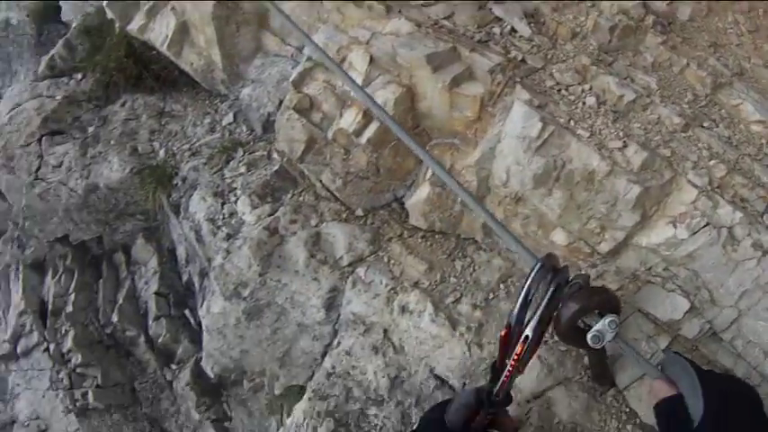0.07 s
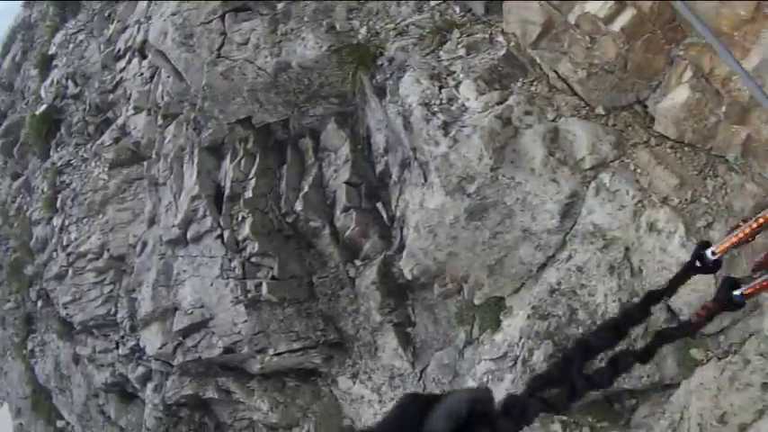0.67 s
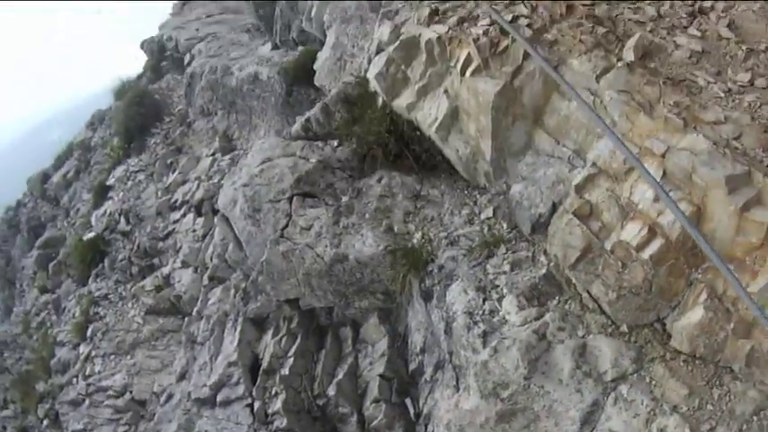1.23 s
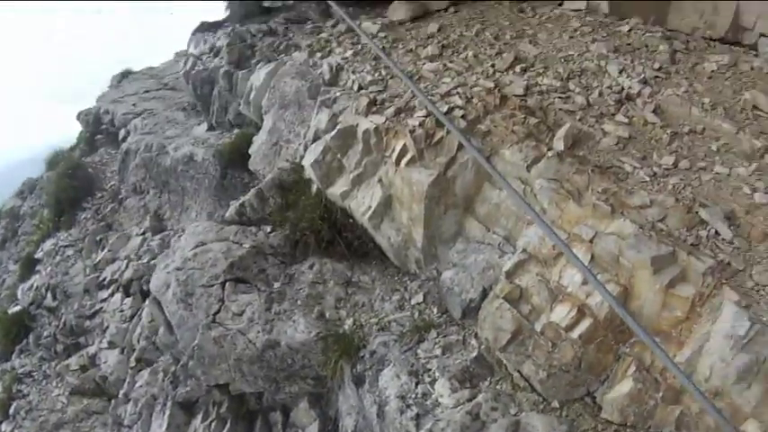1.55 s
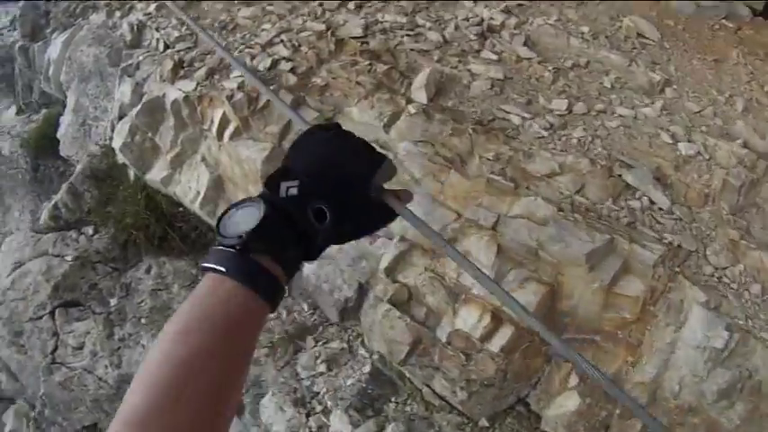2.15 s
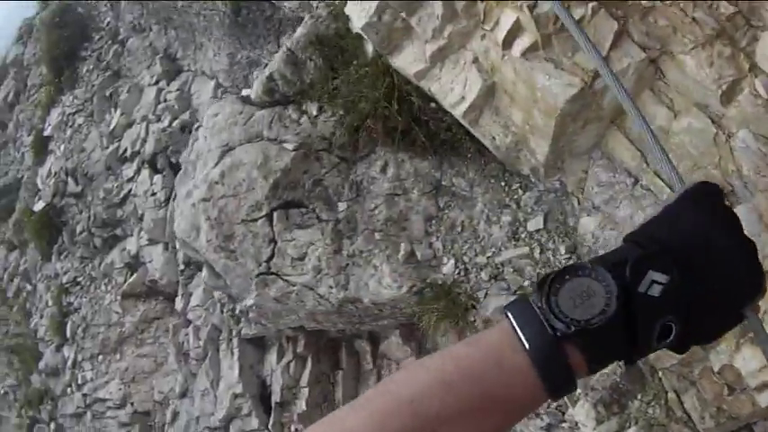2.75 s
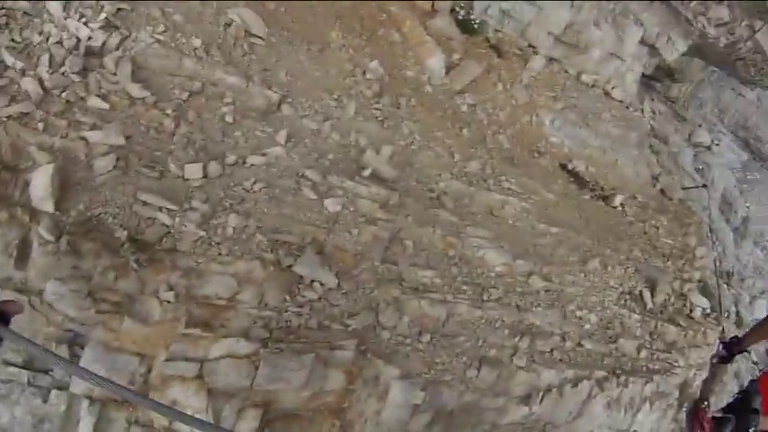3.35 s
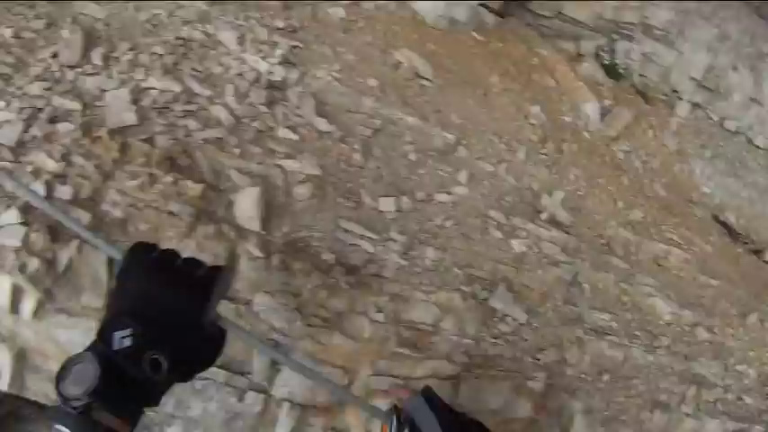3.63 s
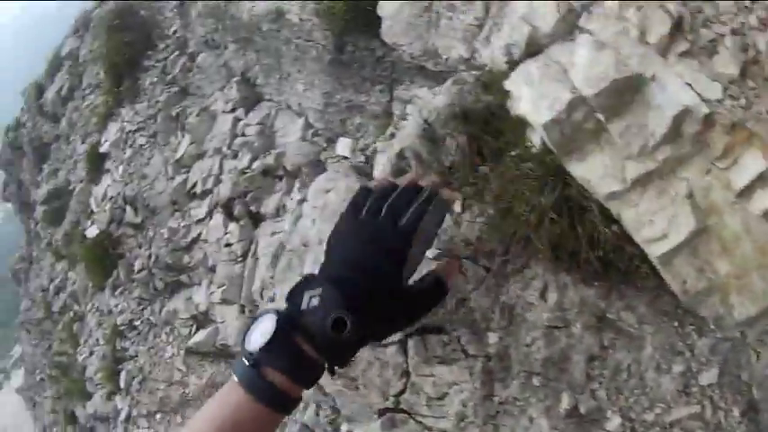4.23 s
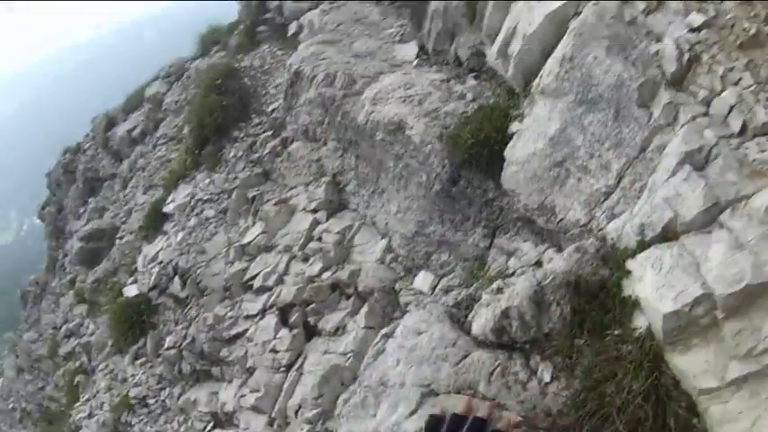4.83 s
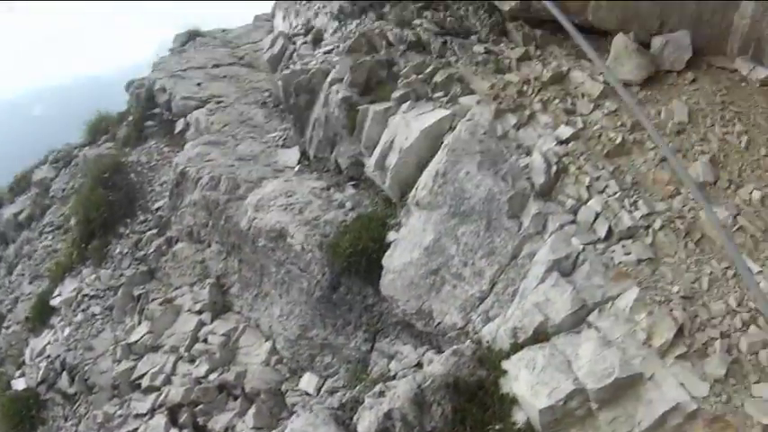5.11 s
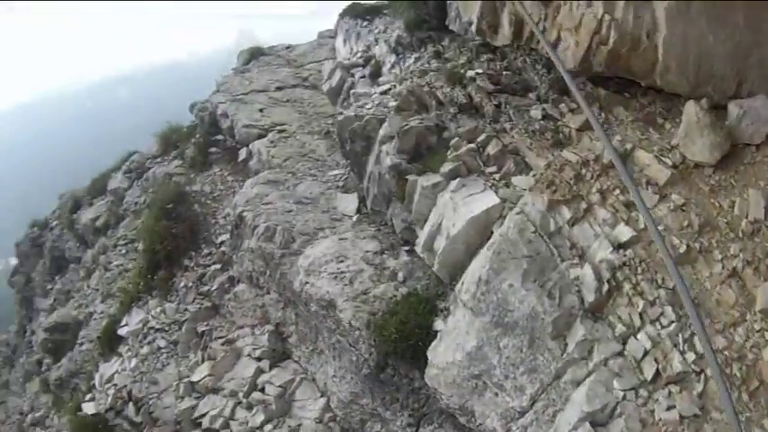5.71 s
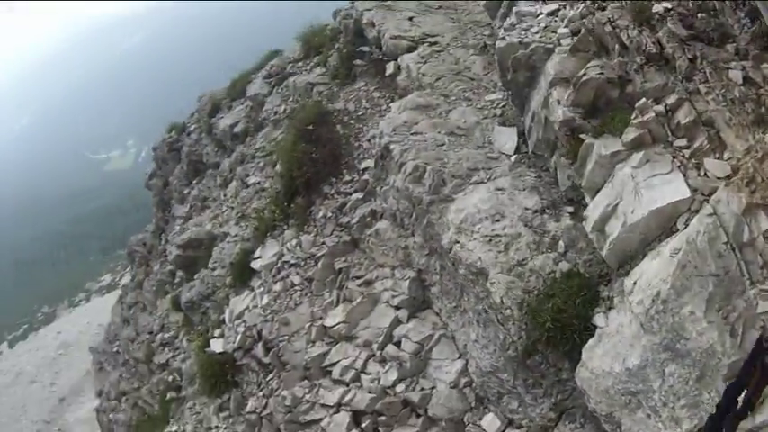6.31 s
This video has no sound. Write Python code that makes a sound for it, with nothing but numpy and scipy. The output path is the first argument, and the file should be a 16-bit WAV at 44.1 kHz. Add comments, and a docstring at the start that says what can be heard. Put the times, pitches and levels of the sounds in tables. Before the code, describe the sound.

Two carabiners clink irregularly and scrape along a steel cable as a climber moves across a rock face. Boots and clothing scuff, a glove zips over the wire strands, and webbing rasps. The sliding grows longer in the middle and again near the end. Everything is close and slightly boxy, heard from a helmet microphone in a closed case, with low rumble, dull thuds and a faint steady hiss underneath.

```python
"""Climbing a steel cable

A climber on a rock face, heard from a camera in a closed case on the helmet; the case rings near 2 kHz.
Two carabiners clink and slide on the cable, a glove zips over its strands, boots and clothing scuff
and webbing rasps. Underneath, the moving body rumbles in the mount over a faint steady hiss."""
import sys
import numpy as np
from scipy import signal
from scipy.fft import rfft, irfft, next_fast_len
from scipy.io import wavfile

SR = 44100
rng = np.random.default_rng(int(sys.argv[2]) if len(sys.argv) > 2 else 0)


def wav_out(sig):
    """Save sig, one row per channel (or a flat mono array), as 16-bit PCM at SR to the path in sys.argv[1]."""
    wavfile.write(sys.argv[1], SR, np.round(np.clip(np.atleast_2d(sig).T, -1, 1) * 32767).astype(np.int16))


N = 289289
TIME = np.arange(N) / SR


def amp(db):
    """Decibels to gain."""
    return 10 ** (np.asarray(db) / 20)


def unit(x):
    """Scales to rms 1."""
    return x / np.sqrt(np.mean(x ** 2) + 1e-20)


def blow(x):
    """Scales a blow, band by band, to the energy of 10 ms at rms 1."""
    return x / np.sqrt((x ** 2).sum(-1, keepdims=True) / (.01 * SR))


def add(mix, start_s, sound):
    """Mixes a sound in at start_s."""
    part = mix[max(round(start_s * SR), 0):][:len(sound)]
    part += sound[:len(part)]


def noise(spectrum):
    """Noise of rms 1 with the given spectral shape."""
    hz, db = np.transpose(spectrum)
    size = next_fast_len(N)
    bins_hz = np.fft.rfftfreq(size, 1 / SR)
    shape = amp(np.interp(np.log1p(bins_hz), np.log1p(hz), db))
    return unit(irfft(rfft(rng.standard_normal(size)) * shape, size)[:N])


def flutter(rate_hz):
    """A smooth random curve of rms 1."""
    knots = rng.standard_normal(N)
    return unit(np.interp(TIME * rate_hz, np.arange(N), knots))


def resonate(x, hz, width_hz):
    """A steep resonance of gain 1, steady or moving, that takes a moment to build up."""
    turn = np.exp(2j * np.pi * np.cumsum(hz * np.ones(len(x))) / SR)
    pole = np.exp(-np.pi * width_hz / SR)
    envelope = signal.lfilter([(1 - pole) ** 2], [1, -2 * pole, pole * pole], x / turn + 1e-18)
    return 2 * (turn * envelope).real


def swell(middle_s, db, half_s):
    """Power of a bell-shaped swell."""
    return amp(db) ** 2 * np.exp(-np.minimum(((TIME - middle_s) / half_s) ** 2, 50))


def swells(rows, bed_db=-140):
    """Gain of several swells over a bed."""
    return np.sqrt(amp(bed_db) ** 2 + sum(swell(*row) for row in rows))


def rubbing(strokes, spectrum, gain_db, grit_db, grit_hz=350):
    """Short gritty swells of friction."""
    return amp(gain_db + grit_db * flutter(grit_hz)) * swells(strokes) * noise(spectrum)


# Background at the helmet microphone: frequency_hz, relative_db
AIR_SPECTRUM = [(59, -10.5), (100, -5.5), (140, -5.5), (649, -14), (928, -15.5), (1440, -16), (1670, -18),
                (2150, -17), (2440, -21), (2830, -21.5), (6700, -28.5), (10200, -34.5), (12300, -37.5),
                (15200, -42)]

def air(level_db=-60.5):
    """A faint steady hiss, strongest in the bass."""
    return amp(level_db) * noise(AIR_SPECTRUM)


# Steady rocking of the climb, carried to the microphone by the mount: time_s, level_db
ROCKING = [(0, -46.5), (1.2, -49), (1.55, -50), (1.9, -51.5), (2.9, -46), (3.2, -51), (3.85, -48.5),
           (4.3, -47.5), (5.7, -46), (6.56, -46.5)]
# Shifts of weight that sway the mount: middle_s, level_db, half_length_s
LURCHES = [(.09, -39.5, 0.047), (.69, -36.5, 0.02), (.89, -45, 0.023), (1.93, -42, 0.095),
           (2.15, -33.5, 0.066), (2.41, -27.5, 0.019), (2.58, -38, 0.052), (2.82, -33.5, 0.035),
           (4.11, -41, 0.08), (4.96, -34.5, 0.022)]
# Dull thuds in the mount, right at the microphone: middle_s, level_db, half_length_s
THUDS = [(.865, -46, 0.0083), (1.11, -49, 0.046), (2.05, -55, .025), (2.165, -44.5, 0.014),
         (2.265, -40, 0.024), (2.42, -44, .03), (2.54, -53, 0.14), (2.785, -41.5, 0.018),
         (2.845, -42, 0.018), (3.02, -57.5, 0.033), (3.22, -53, .02), (4.83, -46.5, 0.042),
         (5.32, -57, 0.057), (6.18, -50, .02)]
# Tone of the sway and of the thuds: frequency_hz, relative_db
SWAY_SPECTRUM = [(2, -11), (8, -12.5), (14, -0.5), (26, -15), (40, -22), (60, -44), (120, -66), (400, -110)]
THUD_SPECTRUM = [(20, -61), (48, -6.5), (66, 1.5), (79, 1.5), (95, -6), (125, -12.5), (180, -25.5),
                 (400, -39), (1500, -76)]

def rumble(thud_gain_db=-1, jiggle_db=-12.5):
    """The body sways the helmet mount, which thuds and keeps jiggling with the rocking of the climb."""
    rocking_db = np.interp(TIME, *np.transpose(ROCKING))
    sway = noise(SWAY_SPECTRUM) * swells(LURCHES, rocking_db)
    thuds = noise(THUD_SPECTRUM) * swells(THUDS, rocking_db + jiggle_db)
    return sway + amp(thud_gain_db) * thuds


# Boots, gloves and clothing, within a body's length: middle_s, level_db, half_length_s
SCUFFS = [(0.037, -56, 0.019), (0.24, -62.5, 0.064), (.70, -63, 0.019), (.77, -56, 0.0093),
          (1.168, -54.5, 0.023), (1.452, -58, .012), (1.921, -53.5, 0.013), (2.071, -55.5, .013),
          (2.125, -52.5, 0.013), (2.265, -56, 0.026), (2.32, -51, 0.0031), (2.41, -59, 0.062),
          (2.763, -52, 0.0086), (2.865, -55.5, 0.0084), (3.06, -56.5, 0.048), (3.68, -64.5, 0.24),
          (4.02, -59.5, 0.047), (4.917, -61.5, 0.05), (5.097, -56.5, 0.016), (5.253, -56, 0.016),
          (5.522, -58.5, 0.029), (6.12, -65, .06)]
# Their tone from inside the case: frequency_hz, relative_db
SCUFF_SPECTRUM = [(300, -3), (800, -13.5), (1100, -1.5), (1420, 5), (1680, -2), (2100, 2), (2600, -10.5),
                  (4000, -22.5), (7500, -29.5), (10000, -58), (15000, -46)]

def scuffs(creases_per_s=6, crease_db=-65.5, crease_half_s=0.011):
    """Boots and fabric rub in dull scuffs, with faint creases of clothing in between."""
    times = np.cumsum(rng.uniform(.5, 1.5, size=60)) / creases_per_s
    creases = [(s, crease_db, crease_half_s) for s in times if s < TIME[-1]]
    return rubbing(SCUFFS + creases, SCUFF_SPECTRUM, gain_db=-0.5, grit_db=2.5)


# Drags of the lanyard, below the helmet: middle_s, level_db, half_length_s
RASPS = [(1.16, -65.5, 0.11), (3.69, -57, 0.19), (4.93, -66, 0.049), (5.81, -60, 0.02), (5.91, -63, 0.074)]
# Their tone from inside the case: frequency_hz, relative_db
RASP_SPECTRUM = [(1500, -30), (2300, 3.5), (2700, -0.5), (3250, -7), (3700, -3), (4400, -12), (6000, -15),
                 (7400, -21), (9000, -33), (15000, -35)]

def webbing():
    """Lanyard webbing rasps brightly as it is dragged along."""
    return rubbing(RASPS, RASP_SPECTRUM, gain_db=-5, grit_db=3)


# The glove sliding up the cable, within arm's reach: middle_s, level_db, half_length_s, pitch_hz
GLOVE_STROKES = [(2.517, -59.5, 0.074, 2120), (2.594, -56, 0.097, 1850), (2.765, -67.5, 0.13, 2060),
                 (3.703, -51.5, 0.044, 2160), (6.205, -61, .04, 1900), (6.33, -60, 0.062, 2000)]

def glove(width_hz=330, gain_db=-1, overtone_db=-17):
    """Fabric zips over the strands; each stroke has its own pitch."""
    out, rub = np.zeros(N), rng.standard_normal(N)
    for middle_s, db, half_s, hz in GLOVE_STROKES:
        zipping = resonate(rub, hz, width_hz) + amp(overtone_db) * resonate(rub, 1.59 * hz, 2 * width_hz)
        out += unit(zipping) * np.sqrt(swell(middle_s, db + gain_db, half_s))
    return out


# Resonances of the closed case around the microphone: pitch_hz, width_hz, gain_db
CASE_MODES = [(1487, 130, -3.5), (2081, 420, -2.5), (2240, 120, -6), (3150, 480, -11.5), (3924, 460, -11.5),
              (4790, 800, -8.5), (6750, 640, -11.5), (7590, 1400, -15), (8200, 140, -13.5),
              (9640, 1400, -25), (10960, 2800, -29)]

def case(x, stretch=1, wall_hz=12600):
    """The case rings in a low, a middle and a high band; stretch bends the pitch of the low one."""
    bands = np.zeros((3, len(x)))
    x = signal.sosfilt(signal.butter(4, wall_hz, fs=SR, output="sos"), x)  # the wall stops the top treble
    for hz, width_hz, db in CASE_MODES:
        band = int(hz > 2700) + int(hz > 5700)
        bands[band] += amp(db) * resonate(x, hz * (stretch if band == 0 else 1), width_hz)
    return bands


# Carabiners sliding on the cable, close by: fastest_s, level_db, rise_s, fall_s, hiss_relative_db
SLIDES = [(.25, -68, 0.11, 0.092, -15), (.44, -57.5, .04, 0.071, -16), (.69, -60, .04, 0.061, -11),
          (3.48, -59, 0.018, .03, 0), (3.71, -54.5, 0.2, 0.29, -9.5), (5.26, -57.5, 0.093, 0.14, -12.5),
          (5.82, -55.5, 0.099, 0.2, -11), (6.09, -51.5, 0.041, 0.034, -13.5), (6.21, -50.5, 0.14, 0.1, -9)]
# The scrape's low resonances, drifting slightly up and back down across the later slides:
# time_s, pitch_ratio
SLIDE_PITCH = [(3.6, 0.99), (5.2, 1.024), (6.12, 0.99), (6.38, 0.99)]

def slides(slips_per_s=6000, spread_db=3, sing_hz=2120, sing_width_hz=190, sheen_hz=6620, hiss_db=-1):
    """Tiny slips over the wire strands, in uneven bumps, excite the case and make the metal sing."""
    slips = (rng.random(N) < slips_per_s / SR) * rng.choice([-1, 1], N)
    slips = slips * amp(spread_db * np.minimum(rng.exponential(1, N), 3))
    slips *= amp(2.5 * flutter(rate_hz=200) + 2.7 * flutter(rate_hz=28))  # quick bumps, slower catches
    stretch = np.interp(TIME, *np.transpose(SLIDE_PITCH))
    low, middle, high = case(slips, stretch)
    sing = unit(resonate(slips, sing_hz * stretch, sing_width_hz))  # each slip renews the cable's ring
    sheen = unit(resonate(slips, sheen_hz, 2 * sing_width_hz))
    body = unit(amp(-2) * unit(low) + amp(-3) * sing)
    hiss = unit(unit(amp(1) * middle + high) + amp(-11) * sheen)
    body_power, hiss_power = np.zeros(N), np.zeros(N)
    for fastest_s, db, rise_s, fall_s, relative_db in SLIDES:
        fade_s = np.where(TIME < fastest_s, rise_s, fall_s)
        speed = np.exp(-abs((TIME - fastest_s) / fade_s) ** 1.27)  # between exponential (1) and bell (2)
        body_power += (amp(db) * speed) ** 2
        hiss_power += (amp(db + relative_db + hiss_db) * speed) ** 2
    return body * np.sqrt(body_power) + hiss * np.sqrt(hiss_power)


# Light touches on a carabiner swinging free, close by: start_s, level_db
PINGS = [(1.08, -64), (1.195, -52), (1.30, -52), (1.868, -56), (1.892, -59), (1.925, -52), (3.077, -50.5),
         (3.259, -41)]
# Its modes: pitch_hz, relative_db, t60_s
CARABINER_MODES = [(3860, -7, 0.026), (4660, -8, 0.083), (4840, -38, 0.029), (7560, -19, .035)]

def pings():
    """A free carabiner keeps ringing in its own modes after each touch."""
    out, t = np.zeros(N), np.arange(SR // 4) / SR
    ring = sum(amp(db - 60 * t / t60) * np.sin(2 * np.pi * hz * t) for hz, db, t60 in CARABINER_MODES)
    for start_s, db in PINGS:
        add(out, start_s, amp(db) * ring)
    return out


# Carabiners knocking on the cable, within arm's reach of the microphone; the level is the body's,
# near 2 kHz: start_s, level_db, clack_relative_db, sparkle_relative_db, clack_pitch_hz
CLINKS = [(0.0255, -51, -3.5, -2.5, 3670), (0.158, -55, -5, -3, 3240), (0.168, -58, -3, -7, 3870),
          (0.246, -50, -9, -14, 3750), (0.3128, -59, -4, -3.5, 3660), (0.452, -64, 4, 1, 3980),
          (0.4949, -51.5, -2.5, -3.5, 4830), (0.5047, -48, -9, -7.5, 5050), (0.691, -54.5, -13, -18, 3900),
          (0.841, -55.5, -3.5, -14, 3800), (0.9998, -54, -7, -10, 4500), (1.0383, -58, -3, -2, 5040),
          (1.0441, -42, -11.5, -5, 4800), (1.0602, -61, 1, -1, 3770), (1.0793, -54, -8, -5.5, 3790),
          (1.2702, -52, -2.5, -12, 3900), (1.293, -48.5, -9, -12.5, 3870), (1.657, -61, -3.5, -14, 3770),
          (1.9112, -59.5, -2, -10, 4540), (2.1105, -54, -6, -14, 4460), (2.1184, -50, 1.5, 1, 3620),
          (2.1237, -51, 1, -8, 3860), (2.643, -60, -4, -5, 2900), (3.0077, -60, -2, -2.5, 4610),
          (3.0479, -62.5, -2, -1.5, 3000), (3.076, -64, -2, -1, 4840), (3.151, -59, -9, -7, 4800),
          (3.1738, -62, -2, -4, 4730), (3.246, -61, -1, -1, 4820), (3.257, -53, -13, -9, 4350),
          (3.3397, -59.5, 0.5, 0.5, 3260), (3.3818, -61.5, 2.5, -1.5, 4780), (3.4687, -57, -6, -6, 4740),
          (3.852, -56.5, -4, -1, 3840), (3.8789, -50.5, 0.5, -0.5, 3840), (3.9574, -57.5, -0.5, -1.5, 3150),
          (4.0548, -57, -4, -8, 4600), (4.072, -49, -9, -14, 5130), (4.1103, -49.5, -2.5, -0.5, 4800),
          (4.3143, -54, -3.5, -3, 5060), (5.086, -57, -5.5, -5.5, 3710), (6.195, -47.5, -20, -14, 5050)]

def clinks(chatter_t60_s=0.055, tail_t60_s=0.12, echo_s=.0048, cable_hz=2148, sparkle_hz=6550):
    """Each knock is a sharp contact, a quick chatter of metal on wire and a faint tail."""
    out, t = np.zeros(N), np.arange(SR // 8) / SR
    envelope = 0.079 * amp(-60 * t / chatter_t60_s) + amp(-40 - 60 * t / tail_t60_s)
    for start_s, db, clack_db, sparkle_db, clack_hz in CLINKS:
        force = rng.standard_normal(len(t)) * envelope
        force[0] += 1  # the contact
        force[round(echo_s * rng.uniform(.8, 1.25) * SR)] += .2  # the rock face is an arm's length away
        bands = blow(case(force))
        bands[0] += amp(1) * blow(resonate(force, cable_hz, width_hz=180))  # the cable's hollow ring
        # the point of contact picks which damped modes of the carabiner speak
        top_hz = sparkle_hz * (1 + 0.1 * rng.standard_normal())
        bands[1] += amp(-5) * blow(resonate(force, clack_hz, width_hz=400))
        bands[2] += amp(-10) * blow(resonate(force, top_hz, width_hz=400))
        band_gains = amp(db + np.array([.5, clack_db, sparkle_db]))
        add(out, start_s, band_gains @ blow(bands))
    return out


def scene():
    """Metal, rubbing and rumble over a faint hiss, in mono at the helmet."""
    return (clinks() + pings() + slides() + scuffs() + webbing() + glove() + rumble() + air())[None]


def record(dry):
    """The camera cuts the treble above 15.25 kHz."""
    lowpass = signal.firwin(511, 15250, window=("kaiser", 9), fs=SR)
    return signal.oaconvolve(dry, lowpass[None], "same")


dry = scene()
out = record(dry)
wav_out(out)
```